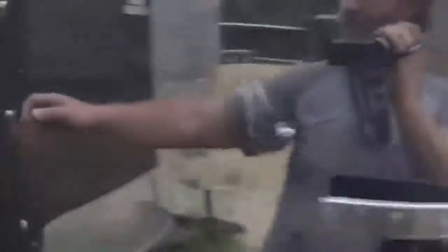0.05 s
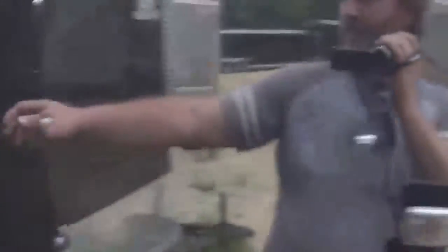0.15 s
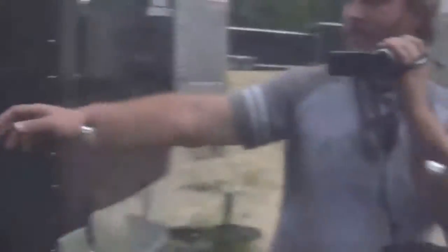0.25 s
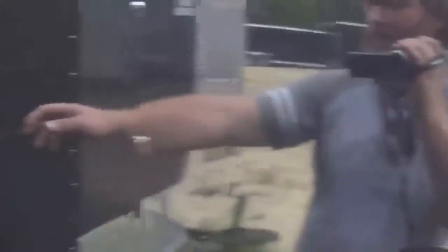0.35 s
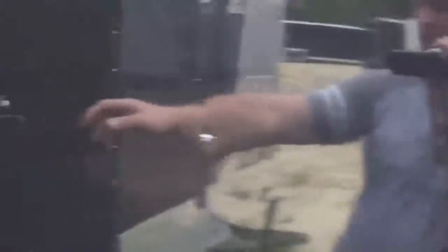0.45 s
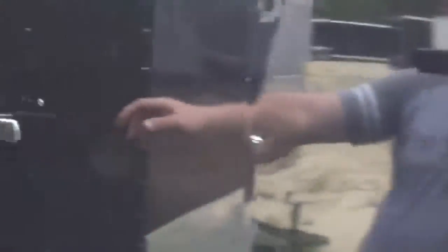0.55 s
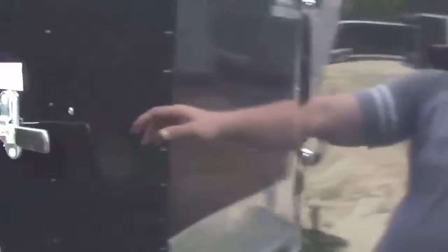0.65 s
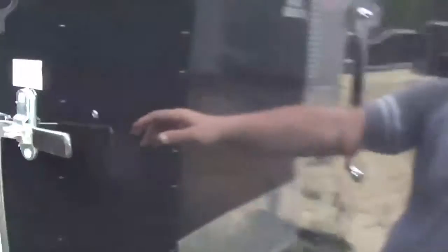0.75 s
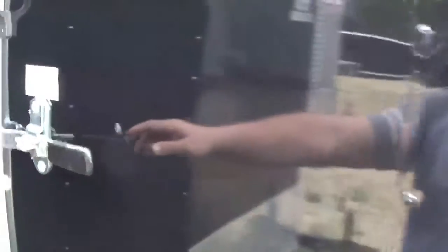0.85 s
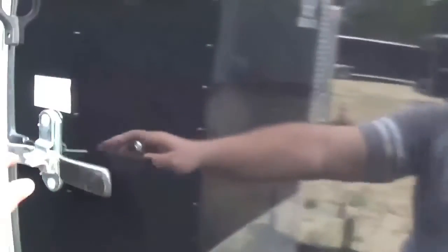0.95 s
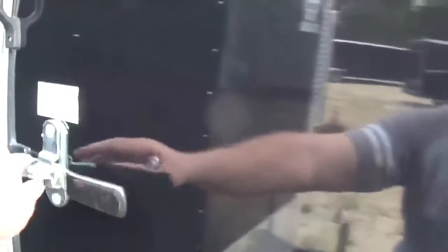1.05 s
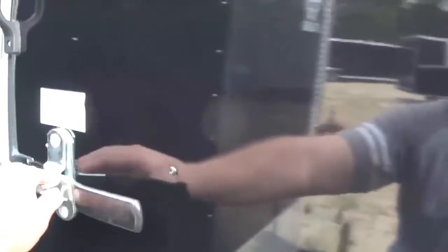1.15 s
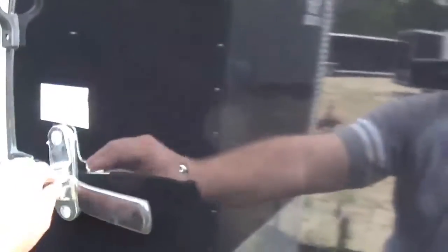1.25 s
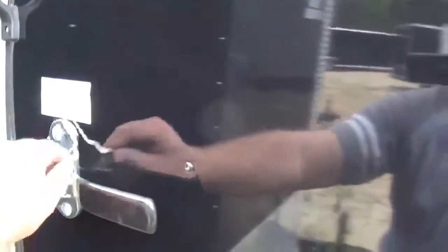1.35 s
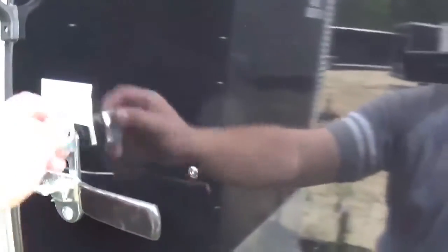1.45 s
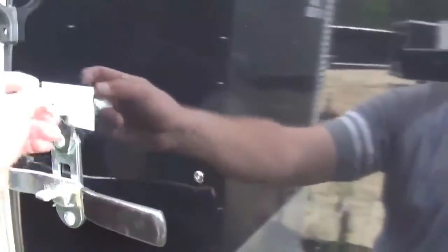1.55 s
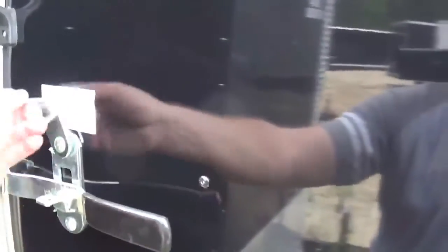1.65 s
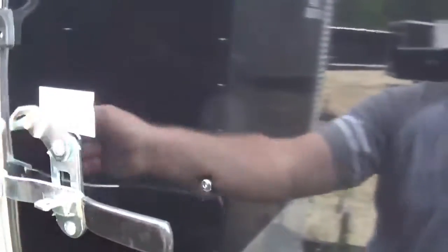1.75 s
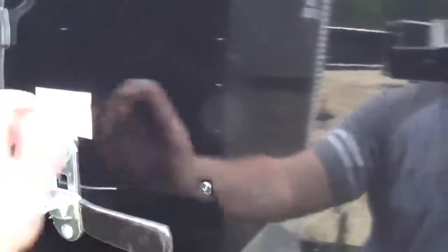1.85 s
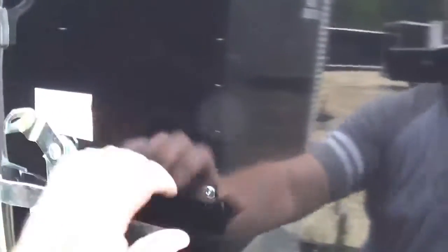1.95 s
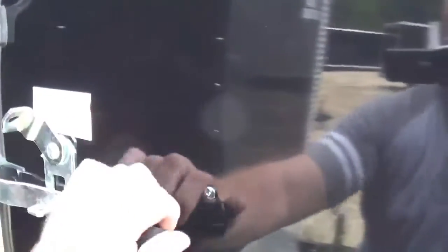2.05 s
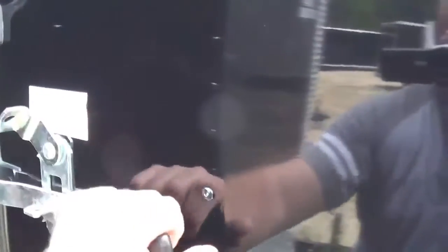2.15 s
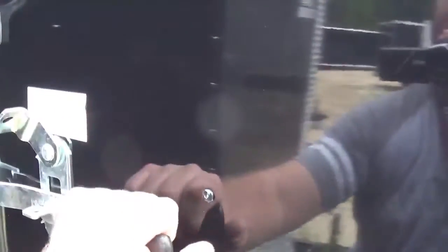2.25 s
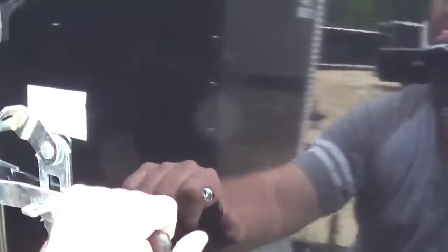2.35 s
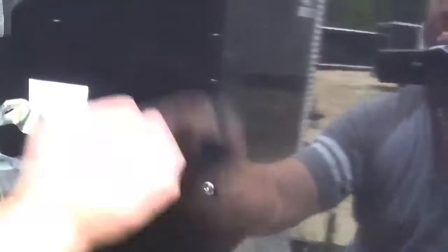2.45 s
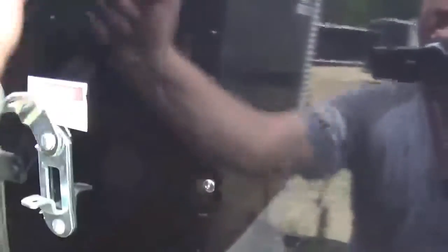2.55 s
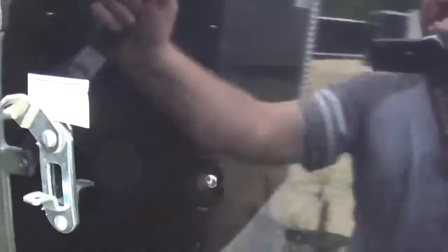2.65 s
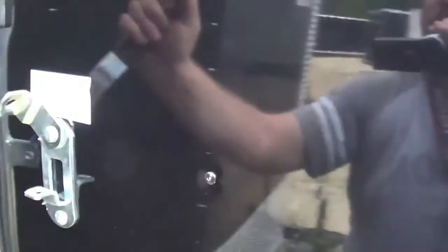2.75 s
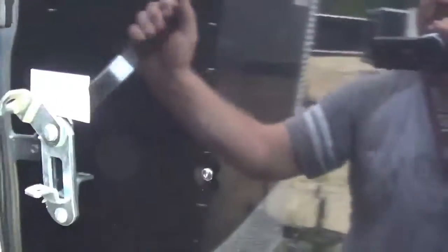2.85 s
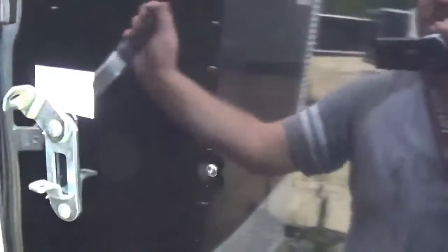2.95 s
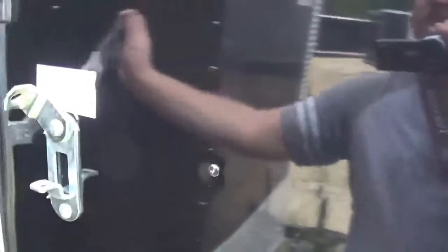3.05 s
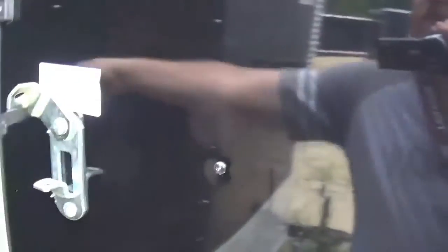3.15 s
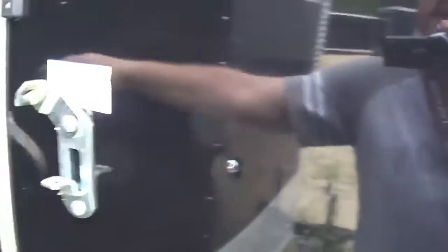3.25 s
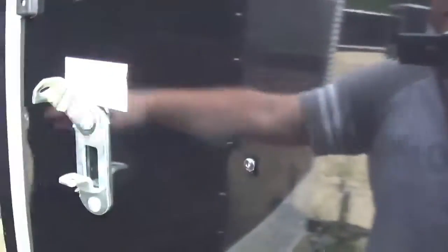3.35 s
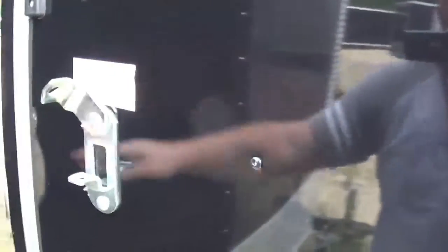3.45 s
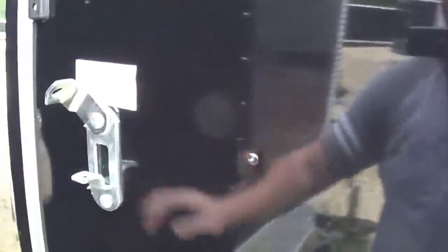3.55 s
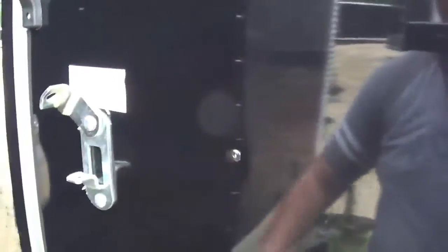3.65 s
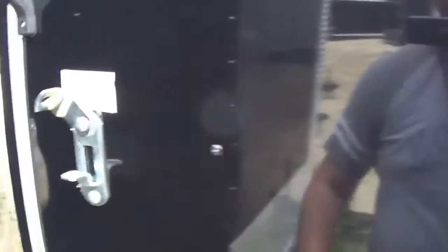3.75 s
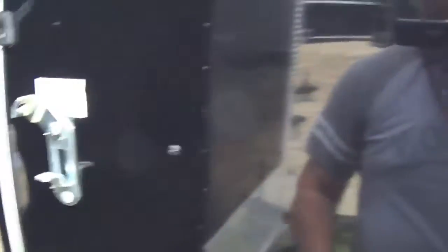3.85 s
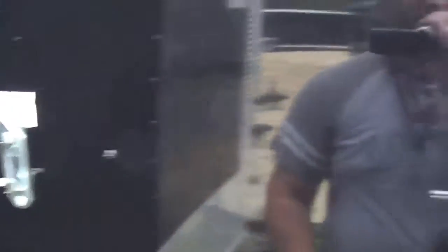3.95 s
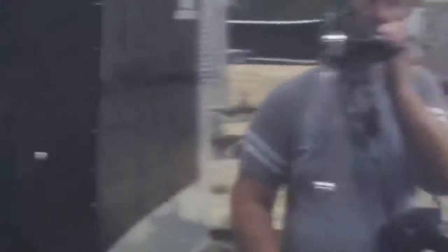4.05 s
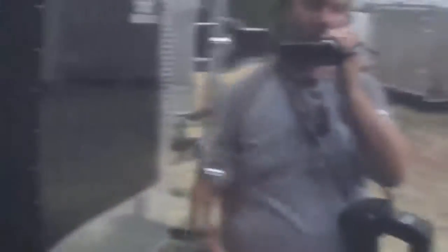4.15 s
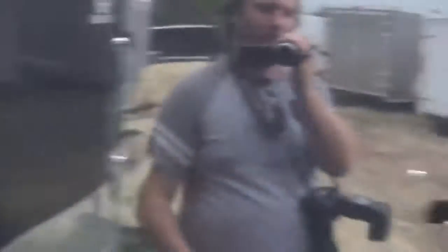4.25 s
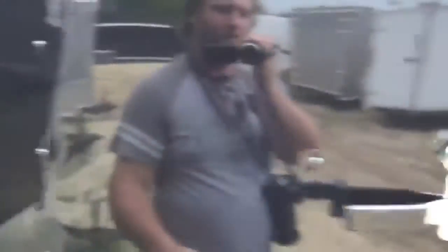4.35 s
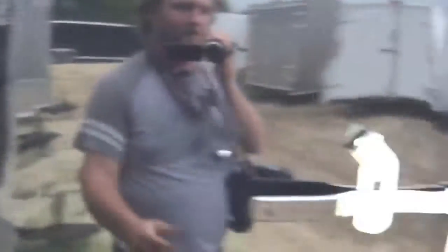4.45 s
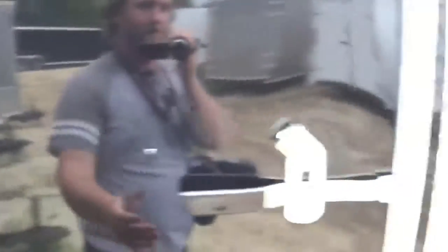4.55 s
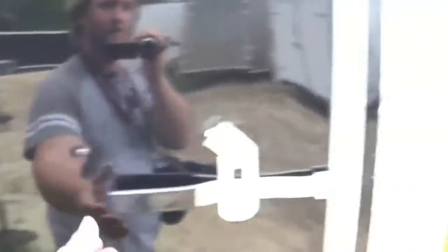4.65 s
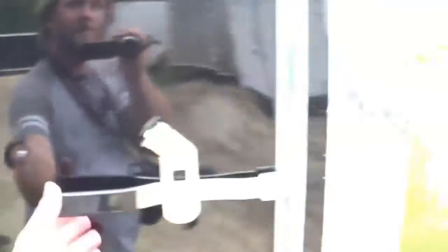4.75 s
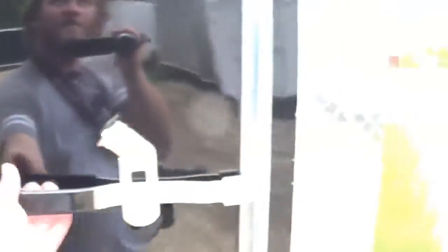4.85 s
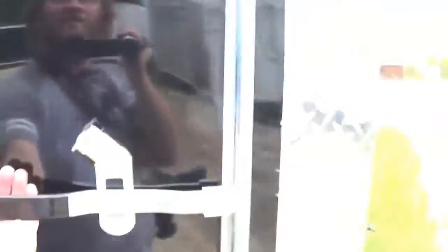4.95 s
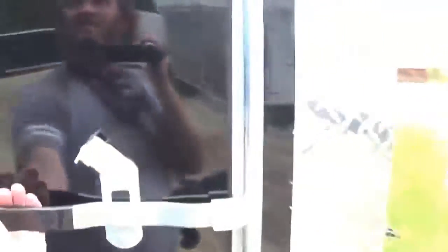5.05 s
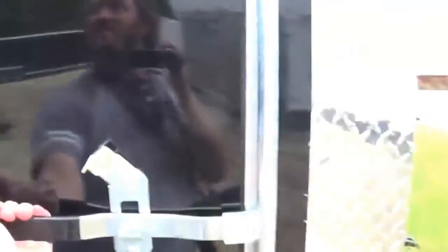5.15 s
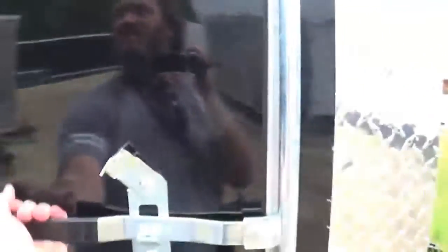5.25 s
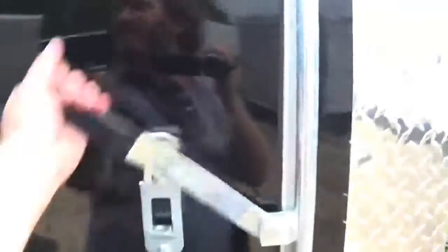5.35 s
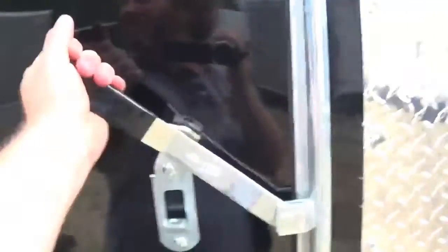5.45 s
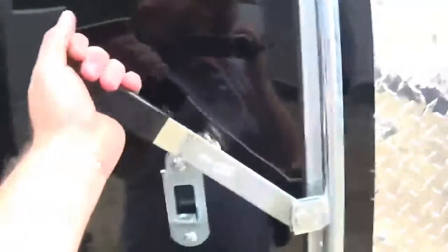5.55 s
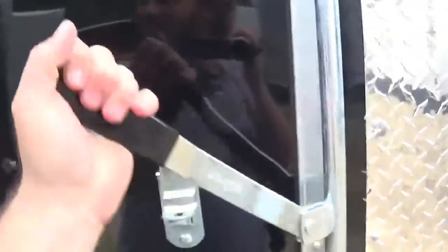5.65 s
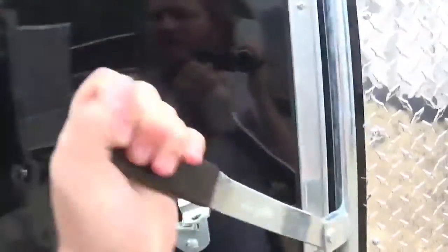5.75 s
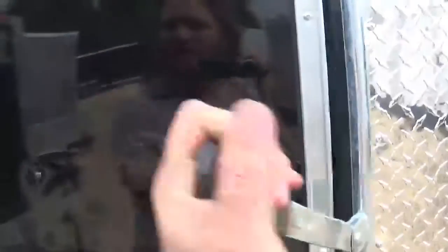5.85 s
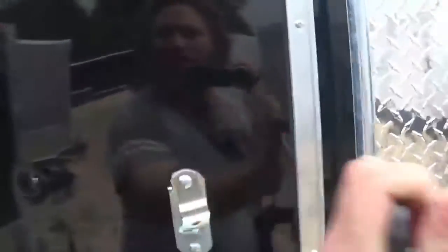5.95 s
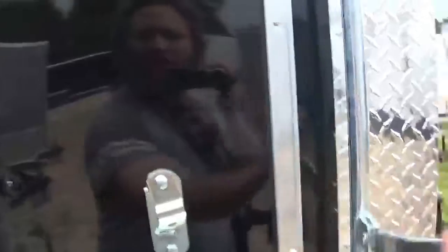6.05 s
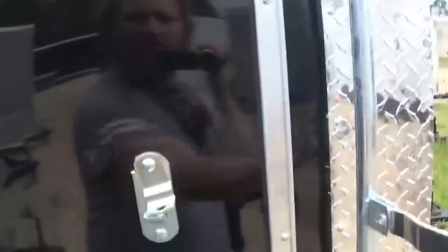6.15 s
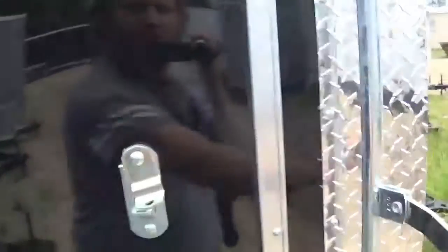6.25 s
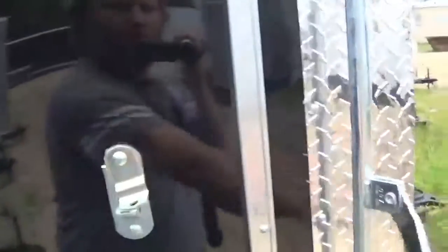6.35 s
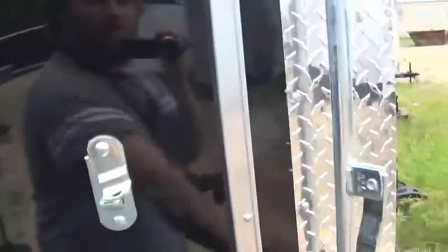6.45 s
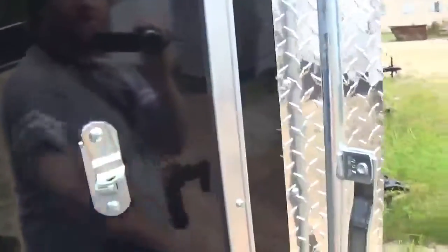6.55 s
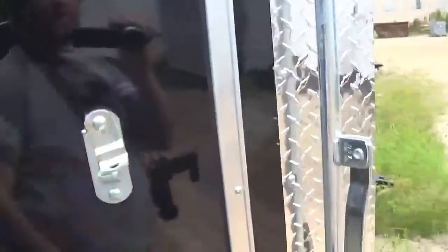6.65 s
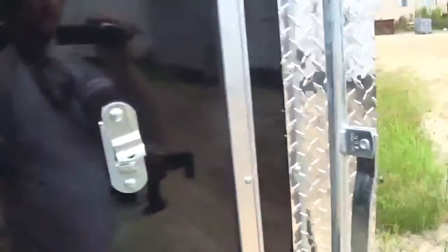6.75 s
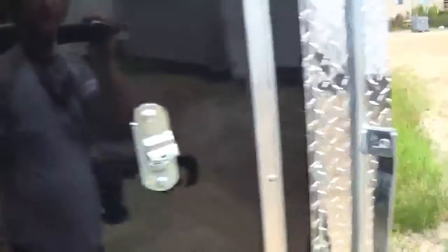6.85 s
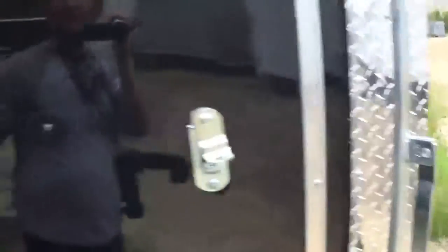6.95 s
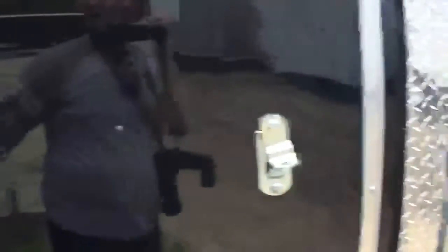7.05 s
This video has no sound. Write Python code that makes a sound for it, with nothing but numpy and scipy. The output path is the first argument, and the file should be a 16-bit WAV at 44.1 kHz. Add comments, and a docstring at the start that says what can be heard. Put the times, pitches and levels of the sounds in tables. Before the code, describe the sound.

Wind rumbles and clothes rustle as metal latches flip and drop in sharp clanks against a hollow door, first one side, then the other.

```python
"""In a quiet yard, close stereo microphone ports take gusts of wind while feet and clothes rustle and
light metal ticks begin. From 1.3 s a hand works the left bar latch of a trailer's rear door: the hasp
flips, then the handle bar drops near 3.4 s. After a lull of ticks and rustling, the right hasp
goes at 5.4 s and its bar at 6.5 s. Filtered noise grains make wind, cloth and loose steel; decaying
modes make the booming sheet-metal door and the ringing parts, and the empty trailer answers."""
import sys
import numpy as np
from scipy import signal
from scipy.fft import rfft, irfft
from scipy.io import wavfile
from scipy.ndimage import uniform_filter1d

SR = 44100
rng = np.random.default_rng(int(sys.argv[2]) if len(sys.argv) > 2 else 0)


def put_to_file(sound):
    """Save the sound as 16-bit audio at rate SR, in the file named by the first command-line argument."""
    columns = np.atleast_2d(sound).T  # one column per channel
    safe = np.clip(columns, -1, 1)
    whole_steps = np.round(safe * 32767)
    wavfile.write(sys.argv[1], SR, whole_steps.astype(np.int16))


def nominal_scale(level):
    """Amplitude ratio for a level in decibels (scalar or array-like)."""
    x = np.asarray(level, float) / 20
    return 10 ** x


N = 313551  # samples

# Hush of the yard behind everything: pitch_hz, relative density_db per Hz
YARD_SPECTRUM = [(35, -40), (60, 2), (126, -4.5), (490, -17), (1500, -25.5), (4600, -39), (9400, -43),
                 (12000, -45)]
# Gusts on the microphone: time_s, relative level_db
GUSTS = [(0, -30.5), (0.147, -20.5), (0.427, -22.5), (0.78, -44.5), (1.115, -18), (1.3, -31.5),
         (1.479, -22), (1.584, -35), (1.763, -23.5), (1.898, -37), (2.048, -21), (2.412, -40), (2.916, -26),
         (3.235, -35), (3.76, -32.5), (4.263, -50.5), (4.517, -33.5), (5.211, -48.5), (6.0, -62),
         (6.25, -45.5), (6.8, -45), (7.11, -29.5)]
# Spectrum of the wind: pitch_hz, relative density_db per Hz
WIND_SPECTRUM = [(12, -45), (20, -5.5), (70, 0.5), (119, 2.5), (295, -8.5), (659, -29), (1200, -32),
                 (1560, -82), (2640, -120)]
# Likeness of the wind at the two ports: pitch_hz, correlation (0 to 1)
WIND_LIKENESS = [(60, 0.75), (350, 0.01), (2000, 0.89), (11500, 0.82)]
# Single eddies popping on a port: start_s, level_db, left_over_right_db
EDDY_POPS = [(0.667, -27, -2), (0.882, -20.5, 14), (1.211, -10, 7), (1.391, -14.5, 6), (1.969, -19.5, 17),
             (2.023, -14, -1.0), (2.889, -18, 1), (2.916, -13.5, 11), (2.987, -28, -9), (3.097, -20, 8),
             (5.435, -10, 3)]
# Fine crackle of cloth: pitch_hz, relative density_db per Hz
CRACKLE_SPECTRUM = [(2000, -16), (3000, 1), (5800, 5.5), (8850, 9), (10500, 8.5), (12000, -6)]
# Duller scuff of feet and cloth: pitch_hz, relative density_db per Hz
SCUFF_SPECTRUM = [(250, -13), (450, -2.5), (790, 1.5), (1150, 0), (1450, -2.5), (2200, -5), (5000, -16),
                  (7000, -27)]
# Steps and brushes of cloth: loudest_s, relative crackle_db, relative scuff_db, length_s
RUSTLES = [(0.162, -49, -36, 0.48), (0.366, -35.5, -38, 0.22), (0.468, -34.5, -35.5, 0.18),
           (0.61, -42, -33, 0.15), (0.685, -38, -41, 0.057), (0.755, -38, -33, 0.2),
           (1.032, -37, -37, 0.15), (1.297, -41.5, -37, 0.17), (1.78, -50.5, -32.5, 0.22),
           (2.226, -51.5, -57, 0.11), (2.353, -63, -42, 0.12), (4.21, -51, -56, 0.65),
           (4.466, -56, -42.5, 0.13), (4.69, -48, -45.5, 0.12), (4.911, -43.5, -40.5, 0.31),
           (5.288, -54, -44.5, 0.52), (6.155, -49, -40.5, 0.28), (6.438, -53, -44, 0.49),
           (6.99, -46, -53.5, 0.22), (7.11, -35, -39, 0.058)]
# Crackle and scuff that never stop: relative crackle_db, relative scuff_db
STEADY_STIR_DB = (-65, -52)
# Echo inside the empty trailer: pitch_hz, t60_s
TRAILER_DECAY = [(200, 0.63), (1000, 0.33), (4000, 0.15), (10000, 0.14)]
# Bursts of latch work: start_s, held_s, relative rattle level_db
WORK_BURSTS = [(1.312, .12, -35.5), (1.745, .05, -37), (1.797, 0.023, -25.5), (2.078, 0.0067, -33.5),
               (2.517, .02, -30), (2.56, .04, -20.5), (2.66, 0.082, -25), (3.339, .08, -27.5),
               (3.43, .12, -23), (5.385, 0.018, -33), (5.418, 0.15, -26.5), (5.748, .13, -32.5),
               (6.49, 0.16, -27)]
# Loose steel rattling: pitch_hz, relative density_db per Hz
RATTLE_SPECTRUM = [(200, -20.5), (400, 6.5), (700, 8), (1100, 3.5), (1700, 1.5), (2600, -2), (5800, -9),
                   (7100, -13.5), (12000, -18)]
# Panel modes of the sheet-metal door: pitch_hz, width_hz, relative level_db
DOOR_MODES = [(180, 27, 2.5), (220.6, 17.3, -2), (257.4, 31, 3.5), (288.7, 33.4, 2), (357, 28.3, -1.5),
              (392, 27, -0.5), (465.4, 91, 7.5), (540, 29, -19.5), (620, 180, 1.5), (692, 134, 7),
              (854, 73, -5.5)]
# Jolts into the door: start_s, relative level_db, favoured_hz
DOOR_JOLTS = [(1.328, -30, 168), (1.552, -10, 376), (2.082, -9.5, 298), (2.569, -25, 218.5),
              (2.601, -13, 234), (2.654, -3.5, 310), (2.68, -7, 217), (2.718, -15, 261), (3.378, -7, 161),
              (3.43, -5, 711), (3.483, -4.5, 769), (3.518, -10.5, 180), (3.559, -7.5, 181.3),
              (4.89, -11, 270), (4.992, -17.5, 650), (5.016, -15, 744), (5.386, -18, 373),
              (5.516, -12.5, 248), (5.547, -7, 213), (5.811, -13, 740), (6.493, -10.5, 159),
              (6.528, -9, 235), (6.579, -5, 274), (6.613, -6, 213), (6.648, -8.5, 303), (6.689, -9, 177)]
# Metal on metal, and lighter ticks between bursts: start_s, relative level_db, mids_db, brightest_hz
KNOCKS = [(0.2115, -12.5, -20, 8000), (0.4815, -9, -3, 7900), (0.667, -13.5, -6, 6300),
          (1.0351, -27.5, 15, 2660), (1.1099, -20, -21, 6470), (1.1214, -17, -7, 6300),
          (1.1465, -22, -4, 2660), (1.3133, -13, 1, 3670), (1.3313, -9.5, 6.5, 3720),
          (1.4052, -28, 15, 2700), (1.4267, -21, 7, 2800), (1.5467, -4, -1.5, 5240),
          (1.7502, -27.5, 16, 2600), (1.7983, -12, -2, 3250), (1.812, -2, -2, 4850),
          (1.823, -15.5, 14, 2940), (1.8567, -6.5, -10, 5160), (2.08, -22, 1, 2770),
          (2.0892, -21, 3.5, 2730), (2.371, -15.5, -26, 8270), (2.5178, -4.5, -1, 2520),
          (2.563, -9, 2.5, 2700), (2.5867, -10, -5, 6800), (2.5994, -8, -7, 2880), (2.6344, -2.5, -3, 5730),
          (2.658, -5.5, -7, 5630), (2.6848, -7.5, -4.5, 5700), (2.7097, -8, 4, 5800),
          (2.74, -24.5, 12.5, 2800), (2.7857, -24, 8, 5800), (3.3377, -31.5, 21.5, 2630),
          (3.373, -19.5, 11.5, 3160), (3.3816, -12, 8, 3150), (3.4109, -16, 7, 2680),
          (3.431, -8, 1.5, 5550), (3.4465, -3, -9.5, 5700), (3.479, -1.5, -17, 3080),
          (3.504, -10, -3, 3140), (3.7474, -31, 3, 8100), (4.206, -22, -23, 8000), (4.3288, -24, -4, 3330),
          (4.4836, -25, 5, 2840), (4.6543, -26, -8, 7100), (5.001, -22, -5, 8250), (5.2874, -27.5, 2, 2750),
          (5.385, -26, 1, 2500), (5.4174, -8.5, 5, 2430), (5.4266, -8, -25, 2600), (5.457, -5, -10, 5600),
          (5.4812, -1, -1, 5600), (5.4974, 0, -7, 5530), (5.5192, -13, 7, 2780), (5.5659, -12.5, 3, 3050),
          (5.6322, -6, -5.5, 5350), (5.644, -9, 2.5, 4150), (5.7135, -16, 9, 5600),
          (5.7538, -2.5, 0.5, 3400), (5.7862, -15, -1, 3570), (5.8022, -6.5, 0.5, 6300),
          (5.8213, -7.5, 6, 5340), (5.8624, -11, -2, 3180), (5.8729, -4, 0.5, 5480),
          (6.1567, -20.5, -3, 2480), (6.4897, -6, -6, 3500), (6.5068, -0.5, -9, 4620),
          (6.564, -2, -10, 5460), (6.574, 2, -16, 4430), (6.5952, -11, -7, 4480), (6.624, -8, -13.5, 3940),
          (6.643, -8.5, -6.5, 3280), (6.6794, -14, -13.5, 3370), (6.7086, -27, -1, 3680),
          (6.8106, -33, 12, 2920)]
# Modes of the brackets: pitch_hz, relative level_db
BRACKET_MODES = [(734, -0.5), (927, -43), (1104, 2.5), (1230, -6.5), (1450, -7), (1630, 2), (1900, -6.5),
                 (2124, -1)]
# Ringing modes of each steel part: pitch_hz, relative level_db, t60_s
LEFT_HASP = [(2304, -4, .2), (5636, 0, .18), (5700, -2, .18), (6557, -4, .18), (10440, -6, .2)]
LEFT_BAR = [(1104, -6, .2), (3122, -11, .18), (8361, 0, .48), (8448, -8, .6), (8683, -1, .25)]
RIGHT_HASP = [(2266, -12, .3), (3505, -18, .8), (5548, 0, .3), (6433, -16, .3), (10143, -14, .3),
              (10200, -3, .45)]
RIGHT_BAR = [(1106, -10, .18), (3144, -16, .17), (8736, 0, .5), (8787, -6, .4), (9025, -6, .13)]
# Blows that leave a part ringing: part modes, then rows of start_s, relative level_db, free_s until stilled
RINGS = [(LEFT_HASP, [(1.56, -40.5, 0.11), (1.80, -28.5, 0.04), (1.858, -38, 0.064), (2.635, -22.5, 0.14),
         (2.708, -22, 0.038), (2.787, -56, 0.082)]), (LEFT_BAR, [(3.415, -34, .03), (3.45, -24, 0.024),
         (3.478, -18, 0.016), (3.505, -23, .27)]), (RIGHT_HASP, [(5.458, -13, 0.029), (5.632, -20.5, 0.081),
         (5.74, -32.5, 0.039), (5.787, -26, 0.1), (5.874, -22, 0.02), (5.93, -51, 0.027)]),
         (RIGHT_BAR, [(5.505, -26.5, .14), (6.51, -26.5, .065), (6.578, -20, 0.061), (6.611, -17.5, 0.039),
         (6.63, -20.5, .4)])]


def evened(x):
    """Scales a signal to rms 1."""
    return x / np.sqrt(np.mean(x ** 2) + 1e-20)


def read_curve(points, hz):
    """Reads a table of values against pitch on a log pitch axis."""
    point_hz, value = np.transpose(points)
    return np.interp(np.log(hz + 1), np.log(point_hz + 1), value)


def add(mix, start_s, sound, pan_db=0):
    """Places a sound in the stereo mix; positive pan leans left."""
    part = mix[:, round(start_s * SR):][:, :len(sound)]
    part += nominal_scale(np.array([[pan_db / 2], [-pan_db / 2]])) * sound[:part.shape[1]]


def colour(x, spectrum):
    """Gives noise a spectrum with a causal minimum-phase filter, then evens its level."""
    hz = abs(np.fft.fftfreq(8192, 1 / SR))
    log_gain = np.log(nominal_scale(np.maximum(read_curve(spectrum, hz), -90)))
    taps = np.fft.ifft(np.exp(np.conj(signal.hilbert(log_gain)))).real[:4096]
    return evened(signal.oaconvolve(x, taps[None], axes=1)[:, :N])


def grains(per_s, spread_db, same):
    """Random clicks of uneven size; the two ports share part of them."""
    size = nominal_scale(spread_db * np.minimum(rng.exponential(1, (2, N)), 5))
    clicks = size * rng.standard_normal((2, N)) * (rng.random((2, N)) < per_s / SR)
    same = np.clip(same, 0, 1)
    return np.array([clicks[0], same * clicks[0] + np.sqrt(1 - same ** 2) * clicks[1]])


def clumps(span_s, depth_db):
    """Random gain that bunches grains into short clumps."""
    size = max(round(span_s * SR), 1)
    drift = uniform_filter1d(uniform_filter1d(rng.standard_normal(N), size), size)
    return evened(nominal_scale(depth_db * evened(drift)))


def busy():
    """Gain per sample of the latch work: each burst jumps up, holds, and dies away."""
    rise_db_per_s, fall_db_per_s = 3000, 134
    t = np.arange(N) / SR
    power = np.zeros(N)
    for start_s, held_s, level_db in WORK_BURSTS:
        before_db = rise_db_per_s * np.maximum(start_s - t, 0)
        after_db = fall_db_per_s * np.maximum(t - start_s - held_s, 0)
        power += nominal_scale(level_db - before_db - after_db) ** 2
    return np.sqrt(power)


def yard():
    """Steady filtered noise makes the quiet air of the yard, much alike at both ports."""
    return nominal_scale(-41.5) * colour(grains(per_s=SR, spread_db=0, same=0.75), YARD_SPECTRUM)


def wind():
    """Eddies push the ports, alike by pitch band; the shaken door adds to the rumble."""
    lumps = rfft(grains(per_s=900, spread_db=2.5, same=0))
    same = np.clip(read_curve(WIND_LIKENESS, np.fft.rfftfreq(N, 1 / SR)), -1, 1)
    lumps[1] = same * lumps[0] + np.sqrt(1 - same ** 2) * lumps[1]
    gust = nominal_scale(np.interp(np.arange(N) / SR, *np.transpose(GUSTS)))
    door_shudder = nominal_scale(-6) * busy()  # deep boom against the rattle
    out = nominal_scale(2.5) * np.hypot(gust, door_shudder) * colour(irfft(lumps, N), WIND_SPECTRUM)
    u = np.arange(1200) / SR / 0.0022
    push = u ** 2 * np.exp(-u) * np.sin(1.87 * u)  # one swing of pressure
    push /= abs(push).max()
    for start_s, level_db, pan_db in EDDY_POPS:
        add(out, start_s, nominal_scale(level_db) * push, pan_db)
    return out


def stirring():
    """Gains per sample of crackle and scuff: a steady stir plus every swelling rustle."""
    end_drop_db, rise_share = 12, 0.48  # fall at a rustle's ends; share of its length spent rising
    t = np.arange(N) / SR
    power = nominal_scale(np.array(STEADY_STIR_DB))[:, None] ** 2
    for loudest_s, crackle_db, scuff_db, length_s in RUSTLES:
        away = np.maximum((loudest_s - t) / rise_share, (t - loudest_s) / (1 - rise_share)) / length_s
        level_db = np.array([[crackle_db], [scuff_db]]) - end_drop_db * away ** 0.85
        power = power + nominal_scale(level_db) ** 2
    return np.sqrt(power)


def rustle():
    """Feet and clothes make dense dry crackle and a duller, clumped scuff."""
    crackle_gain, scuff_gain = stirring()
    crackle = colour(grains(per_s=15000, spread_db=3.5, same=0.82), CRACKLE_SPECTRUM)
    scuff = colour(grains(per_s=5000, spread_db=0.5, same=0.67), SCUFF_SPECTRUM)
    scuff = clumps(span_s=0.019, depth_db=2.5) * scuff
    return nominal_scale(4.0) * crackle_gain * crackle + nominal_scale(2.0) * scuff_gain * scuff


def hollow(x):
    """The empty trailer answers: sparse echoes, each band dying at its own speed."""
    echoes = np.zeros((2, SR // 2))
    slots = np.arange(200, SR // 2 - 20, 20)
    at = slots + rng.integers(0, 20, (2, len(slots)))
    np.put_along_axis(echoes, at, rng.choice([-1., 1.], at.shape), 1)
    hz, t, bands = signal.stft(echoes, SR, nperseg=256)
    t60_s = np.maximum(read_curve(TRAILER_DECAY, hz), 0.02)[:, None]
    tail = signal.istft(bands * nominal_scale(-60 * t / t60_s), SR, nperseg=256)[1]
    tail[1] = 0.62 * tail[0] + 0.98 * tail[1]  # the close ports hear partly the same echo
    return signal.fftconvolve(x, tail / np.linalg.norm(tail[0]), axes=1)[:, :N]


def panel(near_hz, reach):
    """One jolt rings the door's modes, mostly near a pitch; a thin sheet sends out no deep bass."""
    t = np.arange(SR // 3) / SR
    ring = np.zeros(len(t))
    for (hz, width_hz, level_db), turn in zip(DOOR_MODES, rng.random(len(DOOR_MODES))):
        favour = 0.18 + np.exp(-(np.log(hz / near_hz) / reach) ** 2)
        decay = np.exp(-np.pi * width_hz * t)
        ring += nominal_scale(level_db) * favour * decay * np.sin(2 * np.pi * (hz * t + turn))
    no_bass = signal.butter(2, 130, "high", fs=SR, output="sos")
    ring = signal.sosfilt(no_bass, ring * np.minimum(t / 0.0015, 1))
    return ring / abs(ring).max()


def work():
    """Loose steel chatters in uneven clicks and keeps the door shaking; the big jolts thump in it."""
    chatter = colour(grains(per_s=3500, spread_db=2.5, same=0.47), RATTLE_SPECTRUM)
    chatter = clumps(span_s=0.0084, depth_db=4.0) * chatter * nominal_scale([[1.2], [-1.2]])
    hits = grains(per_s=650, spread_db=0.0, same=0.96)
    shake = evened(signal.oaconvolve(hits, panel(460, reach=0.72)[None], axes=1)[:, :N])
    out = busy() * nominal_scale(-0.5) * (chatter + shake)
    for start_s, level_db, near_hz in DOOR_JOLTS:
        add(out, start_s, nominal_scale(level_db - 4.0) * panel(near_hz, reach=0.25), 1.2)
    return out


def chance_taps(count):
    """Small chance contacts, more and louder where the rattle is strong: rows like the knocks."""
    lift_db, spread_db, mids_db = 5, 6, 2.5
    low_hz, high_hz = 2600, 6750
    rattle = busy()
    place, softness, brightness = rng.random((count, 3)).T
    share = np.cumsum(rattle)
    at = np.minimum(np.searchsorted(share, place * share[-1]), N - 1)
    level_db = 20 * np.log10(rattle[at]) + lift_db - spread_db * softness
    bright_hz = low_hz * (high_hz / low_hz) ** brightness
    return list(zip(at / SR, level_db, np.full(count, mids_db), bright_hz))


def knocks():
    """Each knock stirs crowded short treble modes near its bright point, and uneven bracket modes."""
    still_t60_s, shaken_t60_s = 0.041, 0.061
    half_shaken = nominal_scale(-36)  # rattle gain at which a knock's t60 is halfway between the two
    dull_over_bright = 3.85  # the treble falls off above this multiple of the bright point
    out = np.zeros((2, N))
    t = np.arange(8192) / SR
    hz = np.fft.rfftfreq(8192, 1 / SR) + 1
    rows = KNOCKS + chance_taps(count=40)
    crowd = rfft(rng.standard_normal((len(rows), 8192)))
    grip = rng.random((len(rows), len(BRACKET_MODES), 2))
    rattle = busy()
    for (start_s, level_db, mids_db, bright_hz), modes, shares in zip(rows, crowd, grip):
        modes = modes * nominal_scale(4 * evened(uniform_filter1d(modes.real, size=90)))  # lumpy colour, 4 dB rms
        near_bright = 0.41 + np.exp(-(np.log(hz / bright_hz) / 0.12) ** 2)
        treble_edges = (1 + (2500 / hz) ** 6) * (1 + (hz / bright_hz / dull_over_bright) ** 2)
        high = evened(irfft(modes * near_bright / treble_edges))
        mids = evened(irfft(modes / (1 + (hz / 2500) ** 6) / (1 + (600 / hz) ** 6)))

        # a knock lasts longer while the steel around it rattles
        rattle_here = rattle[round(start_s * SR)]
        shaken = rattle_here / (rattle_here + half_shaken)
        t60_s = max(still_t60_s + (shaken_t60_s - still_t60_s) * shaken, 0.006)
        fade_db = -60 * t / t60_s
        clank = np.zeros(len(t))
        for (mode_hz, mode_db), (loss, detune) in zip(BRACKET_MODES, shares):
            tone = np.sin(2 * np.pi * mode_hz * (0.94 + 0.136 * detune) * t)
            clank += nominal_scale(mode_db - 13.4 * loss + 0.83 * fade_db) * tone

        contact = 1 + 0.23 * np.exp(-t / 0.00045)
        treble = contact * nominal_scale(fade_db) * high
        body = np.minimum(t / 0.0014, 1) * (1.34 * nominal_scale(fade_db) * mids + 0.93 * clank)  # swells later
        sound = (treble + nominal_scale(mids_db) * body) * np.minimum(t / 0.00012, 1)
        add(out, start_s, nominal_scale(level_db - 14.0) * sound, 1.5)
    return out


def rings():
    """Blows set off long modes of hasp and bar, stilled when the part touches again."""
    stilled_db_per_s, brush_db = 1800, 3.5
    out = np.zeros((2, N))
    for modes, blows in RINGS:
        for start_s, level_db, free_s in blows:
            t = np.arange(0, free_s + 0.03, 1 / SR)
            ring = np.zeros(len(t))
            # each blow lands elsewhere on the part: random mode losses up to 5 dB, random phases
            for (hz, mode_db, t60_s), (loss, turn) in zip(modes, rng.random((len(modes), 2))):
                ring += nominal_scale(mode_db - 5 * loss - 60 * t / t60_s) * np.sin(2 * np.pi * (hz * t + turn))
            # the loose part keeps brushing its seat
            brush = evened(uniform_filter1d(rng.standard_normal(len(t)), size=500))
            ring *= nominal_scale(brush_db * brush) * np.minimum(t / 0.00076, 1)
            stilled_db = stilled_db_per_s * np.maximum(t - free_s, 0)
            add(out, start_s, nominal_scale(level_db - stilled_db) * ring, 0.4)
    return out


def scene():
    """The latches with their trailer echo, in front of the wind, the rustling and the yard."""
    latch = work() + knocks() + rings()
    return yard() + wind() + rustle() + nominal_scale(-8.0) * hollow(latch) + latch


def top_cut(x):
    """Nothing passes above the cut-off."""
    return signal.sosfilt(signal.butter(12, 12140, fs=SR, output="sos"), x)


def record(dry):
    """The small microphone peaks in the treble and rounds loud peaks; a low-pass limits the band."""
    hz = np.fft.rfftfreq(N, 1 / SR)
    treble_peak_db = 3.75 * np.exp(-((hz - 9600) / 1800) ** 2)
    bright = irfft(rfft(dry) * nominal_scale(treble_peak_db), N)
    ceiling = 0.77  # of full scale
    soft = ceiling * np.tanh(bright / ceiling)
    low_pass = signal.firwin(401, 11050, window=("kaiser", 5.5), fs=SR)
    finished = signal.oaconvolve(soft, low_pass[None], "same")
    return top_cut(finished)


dry = scene()
out = record(dry)
put_to_file(out)
```